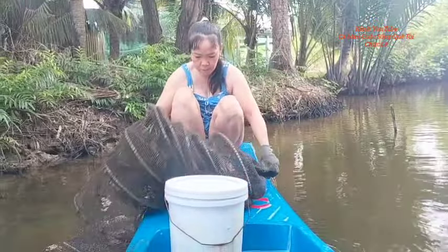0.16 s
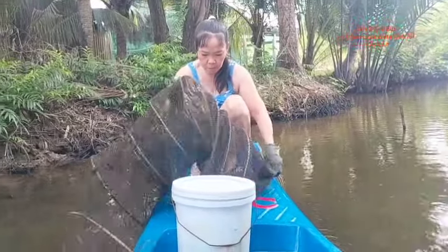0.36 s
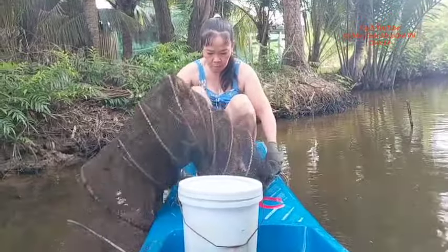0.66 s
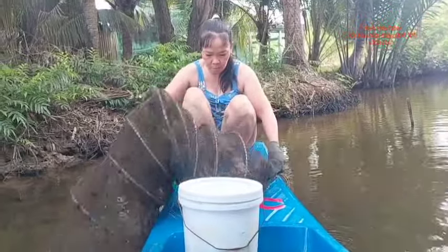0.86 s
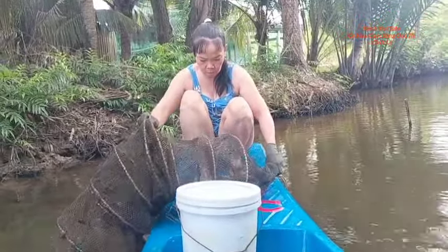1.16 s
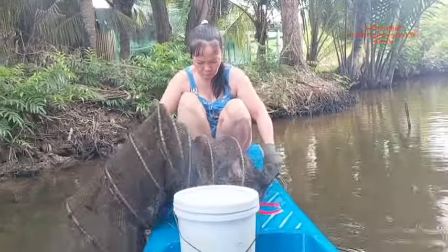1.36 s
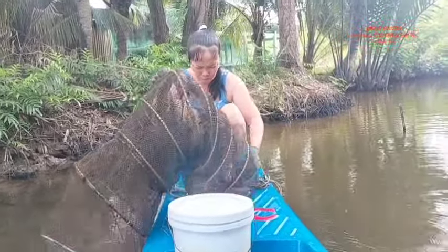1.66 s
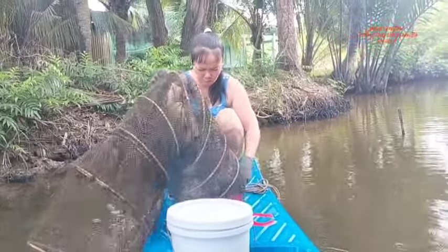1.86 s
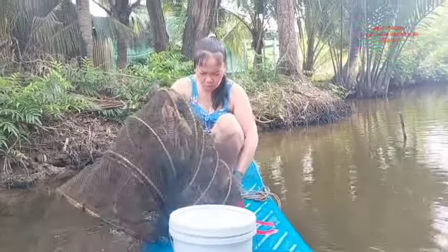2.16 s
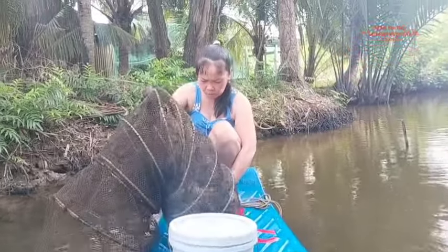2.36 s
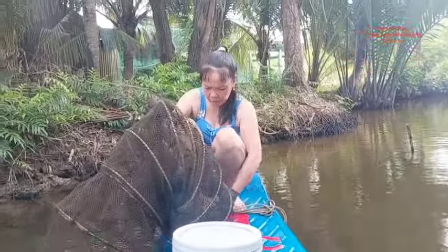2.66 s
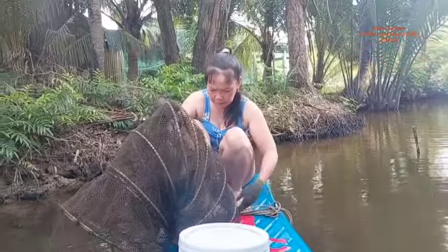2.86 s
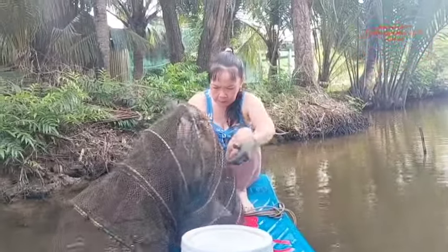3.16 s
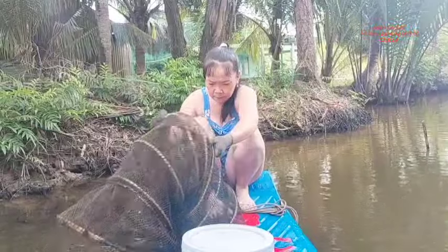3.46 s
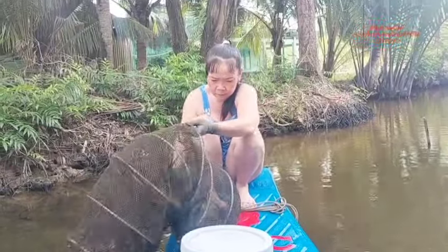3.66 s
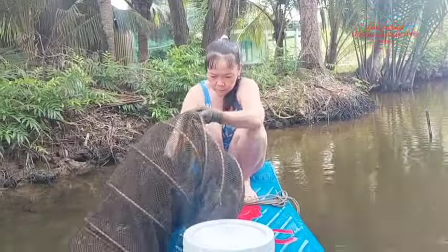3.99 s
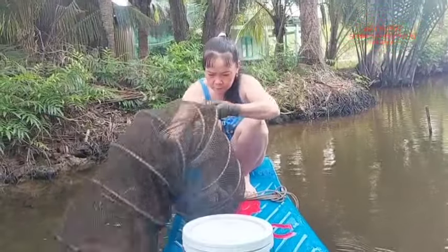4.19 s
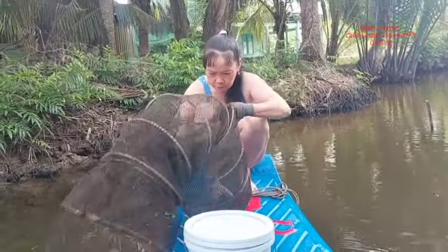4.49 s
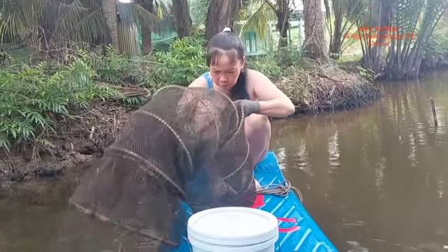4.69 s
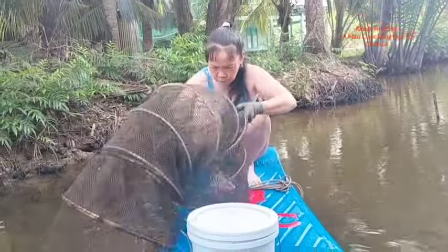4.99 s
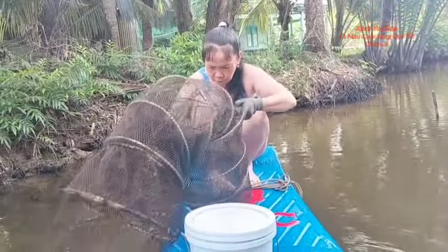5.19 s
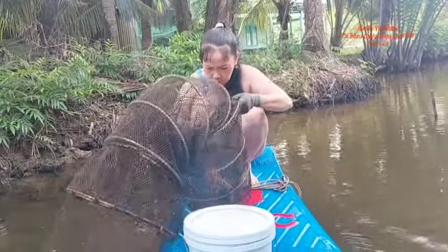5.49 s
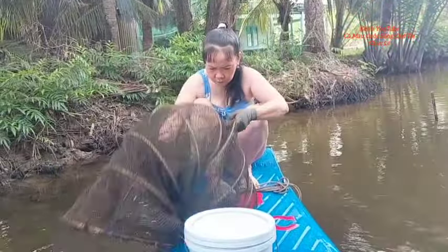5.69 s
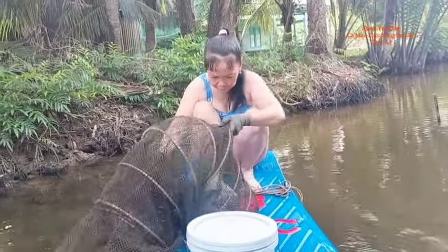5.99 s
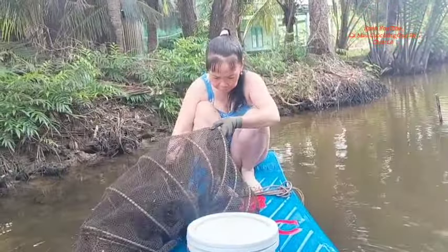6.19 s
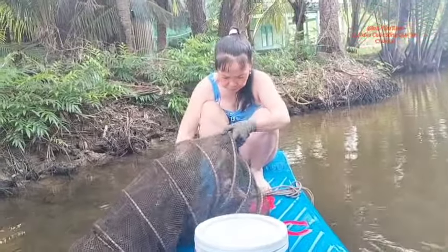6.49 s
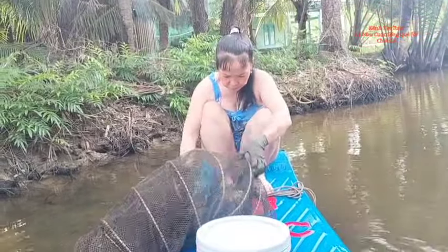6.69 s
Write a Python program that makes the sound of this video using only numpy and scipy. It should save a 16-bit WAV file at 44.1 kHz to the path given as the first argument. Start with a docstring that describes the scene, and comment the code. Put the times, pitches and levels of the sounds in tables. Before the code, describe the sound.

Close to a stereo microphone on a small boat, a wet net trap is dragged and shaken. Its hoops bump the hollow hull with dull booms and clatter, while live shrimp rattle in quick wet flurries and snap sharply against a plastic bucket. Water trickles and gurgles, leaves hiss faintly, and a distant falling whistle comes near the start and again late.

```python
"""Shaken shrimp trap on a small boat

On a quiet canal a net trap is gathered and shaken aboard a fibreglass boat, close to a camera's two microphones.
Live shrimp flick a plastic bucket: clumped noise grains in wet flurries, noise cracks for the sharp snaps.
Hoops and bucket bump the hollow hull (decaying modes), and the mesh drags over the deck (filtered grains).
Water gurgles and drips (rising sines), leaves hiss, and far off a wavering sine whistles among the palms."""
import sys
import numpy as np
from scipy import signal
from scipy.fft import rfft, irfft, next_fast_len
from scipy.io import wavfile
from scipy.ndimage import map_coordinates

SR = 44100
rng = np.random.default_rng(int(sys.argv[2]) if len(sys.argv) > 2 else 0)


def store_wav(level_fs):
    """Save 16-bit WAV to argv[1]."""
    pcm = np.round(np.clip(np.atleast_2d(level_fs), -1, 1) * 32767)
    wavfile.write(sys.argv[1], SR, pcm.T.astype(np.int16))


N = 301968

# Low rumble of hull and deck. Each row: frequency in Hz, relative level in dB per Hz.
RUMBLE_SPECTRUM = [(30, -14.5), (55, 3.5), (72, -3.5), (86, 6.5), (112, -2), (138, -2.5), (170, -4),
                   (208, -11), (260, -13.5), (420, -34.5), (1500, -120)]
# Threads and hard edges scuffing the deck. Each row: frequency in Hz, relative level in dB per Hz.
SCRAPE_SPECTRUM = [(180, -28), (300, -6.5), (500, 2), (800, -3.5), (1200, -12), (2200, -18), (4500, -28),
                   (16000, -43.5)]
# Patter of wet shells, also the body of the trickle. Each row: frequency in Hz, relative level in dB per Hz.
PATTER_SPECTRUM = [(300, -51.5), (700, 7), (1100, -1), (1700, 2), (2600, 2.5), (3600, -1.5), (5000, -14),
                   (12000, -37)]
# Bright spray of droplets and clicks. Each row: frequency in Hz, relative level in dB per Hz.
SPRAY_SPECTRUM = [(1200, -60), (2500, -20), (4200, 0), (6300, 0), (9500, -4), (12000, -3), (15500, -8),
                  (19000, -40)]
# Shakes of the net, each a flurry of wet shells and mesh.
# Each row: start in seconds, length in seconds, strength in dB (the layers it drives are set relative to it).
NET_SHAKES = [(0.547, 0.044, -55.5), (0.668, .025, -50.5), (0.769, 0.0033, -44), (0.804, 0.053, -46),
              (0.948, 0.056, -48), (1.172, 0.028, -46), (1.257, 0.051, -52.5), (1.348, 0.031, -49.5),
              (1.629, 0.051, -50), (1.712, 0.029, -53), (1.885, 0.0092, -52.5), (2.03, 0.15, -47),
              (2.497, 0.018, -44.5), (2.54, 0.014, -44), (2.648, 0.031, -51), (2.732, 0.035, -44),
              (2.855, 0.023, -44.5), (3.106, 0.063, -47), (3.631, 0.12, -52), (3.866, 0.0067, -48.5),
              (3.98, 0.046, -44), (4.178, 0.044, -48), (4.553, 0.029, -46.5), (4.749, 0.057, -46.5),
              (4.974, 0.014, -44), (5.08, 0.054, -53.5), (5.288, 0.0092, -49), (5.521, 0.063, -48),
              (5.757, .043, -41), (5.877, 0.034, -45), (6.082, .03, -43), (6.181, 0.017, -43),
              (6.25, 0.02, -45.5), (6.404, 0.046, -45.5), (6.558, 0.017, -56), (6.699, 0.054, -52)]


def amp(db):
    """Decibels to gain."""
    return 10 ** (np.asarray(db) / 20)


def unit(x):
    """Scale to rms 1."""
    return x / np.sqrt(np.mean(x ** 2) + 1e-20)


def along(points, hz):
    """Read (Hz, value) points on a log frequency axis."""
    f, v = np.transpose(points)
    return np.interp(np.log(hz + 1), np.log(f + 1), v)


def wobble(rate):
    """A smooth random curve with `rate` knots a second."""
    knots = rng.standard_normal(int(N * rate / SR) + 4)
    return map_coordinates(knots, [np.arange(N) * rate / SR])


def add(track, s, sound):
    """Mix a sound into a track at time s in seconds."""
    i = max(round(s * SR), 0)
    part = track[..., i:i + sound.shape[-1]]
    part += sound[..., :part.shape[-1]]


def colour(x, spectrum):
    """Causal (minimum-phase) filter that keeps the power of white noise."""
    m = 2 * next_fast_len(N // 2 + 8192)
    gain = unit(amp(along(spectrum, np.fft.rfftfreq(m, 1 / SR))))
    # folding the cepstrum onto positive time makes the filter causal
    cepstrum = irfft(np.log(gain + 1e-6), m)
    cepstrum[1:m // 2] *= 2
    cepstrum[m // 2 + 1:] = 0
    return irfft(rfft(x, m) * np.exp(rfft(cepstrum)), m)[..., :N]


def spread(pair):
    """Two unrelated signals become left and right, alike in the bass; the left microphone hears them first."""
    # Likeness of the two microphones. Each row: frequency in Hz, coherence from 0 to 1.
    likeness = [(25, 1), (70, 0.95), (200, 0.92), (500, 0.86), (1000, 0.4), (2500, 0.33), (4500, 0.23),
                (12000, 0.092)]
    lead_s = 0.00006
    hz = np.fft.rfftfreq(N, 1 / SR)
    turn = np.arccos(np.clip(along(likeness, hz), -1, 1)) / 2
    mid, side = rfft(pair) * [np.cos(turn), np.sin(turn)]
    right_delay = np.exp(-2j * np.pi * hz * lead_s)
    return irfft([mid + side, (mid - side) * right_delay], N)


def grains(rate, scatter_db):
    """Tiny contacts of uneven size, `rate` a second, rms 1; both microphones hear each, at unrelated strengths."""
    struck = rng.random(N) < rate / SR
    size = struck * amp(scatter_db * np.minimum(rng.exponential(size=N), 3))
    return unit(size * rng.standard_normal((2, N)))


def echo(x, decay):
    """A diffuse stereo tail of noise in which each frequency dies at its own speed."""
    hz, t, z = signal.stft(rng.standard_normal((2, SR // 2)), SR, nperseg=256)
    fade = amp(-60 * t / along(decay, hz)[:, None])
    tail = signal.istft(z * fade, SR, nperseg=256)[1]
    return signal.fftconvolve(np.atleast_2d(x), tail / np.linalg.norm(tail[0]), axes=1)[:, :N]


def ring(modes, rise, detune, scatter_db):
    """One blow on a set of modes, rms 1 over its first 30 ms; each blow lands on a new spot."""
    t = np.arange(SR // 2) / SR
    hz, db, t60 = np.transpose(modes)[:, :, None]
    shift, size, phase = rng.standard_normal((3, len(modes), 1))
    level = amp(db + scatter_db * size - 60 * t / t60)
    waves = level * np.sin(2 * np.pi * hz * (1 + detune * shift) * t + phase)
    sound = waves.sum(0) * (1 - np.exp(-t / rise))
    return sound / np.sqrt(np.mean(sound[:SR * 3 // 100] ** 2))


def canal():
    """Steady air over the water, a flickering hiss of palm leaves, and a light breeze on each microphone."""
    # Air over the water. Each row: frequency in Hz, relative level in dB per Hz.
    air_spectrum = [(20, 3.5), (45, 2.5), (80, 1), (200, -1.5), (320, -12.5), (800, -21.5), (1400, -27),
                    (2600, -30), (4000, -34), (6000, -42.5), (12000, -74)]
    # Hiss of the leaves. Each row: frequency in Hz, relative level in dB per Hz.
    leaf_spectrum = [(1500, -25), (3500, 3), (5200, 0), (8000, -2), (12000, -3), (15500, -7), (19000, -30)]
    # Breeze at the microphones. Each row: frequency in Hz, relative level in dB per Hz.
    breeze_spectrum = [(15, 8), (35, -10.5), (60, -6), (150, -10), (400, -120)]
    air = amp(-42.5) * colour(rng.standard_normal((2, N)), air_spectrum)
    leaves = amp(-63.5 + 0.5 * wobble(3)) * colour(rng.standard_normal((2, N)), leaf_spectrum)
    gusts = amp(-46 + 2.5 * np.array([wobble(4), wobble(4)]))
    gusts = gusts * amp([[-2], [2]])  # stronger on the right
    return spread(air + leaves) + gusts * colour(rng.standard_normal((2, N)), breeze_spectrum)


def whistle():
    """A far whistle: a wavering sine sinks in pitch, swells and ebbs, blurred by an echo from the trees."""
    # One table a call. Each row: time in seconds, mean pitch in Hz, relative level in dB.
    calls = [
        [(.39, 2790, -67), (.46, 2520, -52), (.51, 2235, -51), (.57, 2000, -60)],
        [(5.22, 2830, -59), (5.28, 2600, -52), (5.36, 2264, -59), (5.5, 1900, -61), (5.65, 1607, -58),
         (6.05, 1540, -61), (6.7, 1420, -66)],
    ]
    # Echo among the palms. Each row: frequency in Hz, decay by 60 dB in seconds.
    palm_decay = [(500, 1), (3000, 0.41), (10000, 0.059)]
    tone = np.zeros(N)
    for call in calls:
        s, hz, db = np.transpose(call)
        t = np.arange(s[0], s[-1], 1 / SR)
        pitch = np.interp(t, s, hz) * (1 + 0.016 * wobble(160)[:len(t)])
        level = amp(np.interp(t, s, db) + 3 * wobble(22)[:len(t)])
        add(tone, s[0], level * np.sin(2 * np.pi * np.cumsum(pitch) / SR))
    return amp(-10) * tone + amp(-3) * echo(tone, palm_decay)


def bubble(hz, t60):
    """A ringing air pocket whose pitch rises from hz as it nears the surface."""
    u = np.arange(int(t60 * SR)) / (t60 * SR)
    level = (1 - np.exp(-u / 0.03)) * amp(-60 * u)
    return level * np.sin(2 * np.pi * hz * t60 * (u + 0.163 * u ** 2))


def water(count=300):
    """The stirred hull murmurs, the wet net trickles in fine grains, and air pockets drip and gurgle."""
    # How hard the boat is stirred and the lifted net drains.
    # Each row: time in seconds, relative hull rumble in dB, relative trickle in dB.
    stirring = [(0.0, -31.5, -72), (0.78, -30.5, -65.5), (3.7, -43.5, -59), (6.85, -33.5, -64)]
    # Gurgles under the bow and drips off the net.
    # Each row: start in seconds, starting pitch in Hz, decay by 60 dB in seconds, relative level in dB.
    gurgles = [(1.83, 660, 0.052, -35.5), (1.959, 390, 0.17, -41.5), (2.324, 480, 0.09, -45.5),
               (2.585, 440, 0.21, -40), (3.948, 2370, 0.0055, -32.5), (4.086, 2160, 0.0066, -35),
               (4.37, 1070, 0.012, -33.5)]
    # Ring of drips among bucket and hull. Each row: frequency in Hz, decay by 60 dB in seconds.
    bucket_decay = [(200, 0.12), (1000, 0.1), (4000, 0.4), (12000, 0.61)]
    s, *columns = np.transpose(stirring)
    rumble_db, trickle_db = [np.interp(np.arange(N) / SR, s, c) for c in columns]
    murmur = colour(grains(rate=900, scatter_db=3.5), RUMBLE_SPECTRUM)
    rumble = amp(rumble_db - 4.5 + 4.9 * wobble(14.0)) * murmur
    runoff = amp(trickle_db + 1.2 * wobble(25)) * grains(rate=1800, scatter_db=2.5)
    trickle = amp(-0.5) * colour(runoff, PATTER_SPECTRUM) + amp(-3) * colour(runoff, SPRAY_SPECTRUM)
    drops = np.zeros((2, N))
    # most drips are tiny and sink into the trickle
    for when, pitch, size, side in rng.random((count, 4)):
        level = amp(trickle_db[int(when * N)] + 2 + 10 * size ** 3)
        drip = level * bubble(1100 * 3.5 ** pitch, t60=0.016)
        add(drops, when * N / SR, np.sqrt([[side], [1 - side]]) * drip)
    for s, hz, t60, db in gurgles:
        slosh = amp(4 * wobble(150)[:int(t60 * SR)])
        add(drops, s, amp(db + 5) * slosh * bubble(hz, t60))
    return spread(rumble + trickle) + drops + amp(1.5) * echo(drops, bucket_decay)


def slips():
    """Short strokes (s, length s, rumble dB, scrape dB): the mesh slips on a little after every shake."""
    extra_s, over_shake_db = 0.029, np.array((10.5, -1))  # rumble, scrape over the shake's strength
    return [(s, length + extra_s, *(db + over_shake_db)) for s, length, db in NET_SHAKES]


def net():
    """The mesh catches and slips on the deck: the hull rumbles and the threads scrape, both as filtered grains."""
    # Pulls of the net. Each row: start in seconds, length in seconds, relative rumble in dB, relative scrape in dB.
    pulls = [(0.077, 0.24, -52, -47.5), (0.262, 0.2, -22, -36), (0.518, 0.17, -30.5, -40.5),
             (0.805, 0.05, -22, -28.5), (1.128, 0.057, -28, -45), (1.242, 0.068, -32, -50),
             (1.53, 0.14, -24, -40), (2.053, 0.088, -20.5, -35.5), (2.482, 0.3, -34, -53),
             (2.86, 0.042, -39, -36), (4.22, 0.1, -32.5, -37.5), (6.08, 0.2, -40, -43.5)]
    rumble, scrape = np.zeros((2, N))
    for s, length, rumble_db, scrape_db in [*pulls, *slips()]:
        stroke = np.sin(np.linspace(0, np.pi, int(length * SR)))
        add(rumble, s, amp(rumble_db) * stroke)
        add(scrape, s, amp(scrape_db) * stroke)
    catch = amp(1.3 * wobble(60))
    threads = catch * scrape * grains(rate=2000, scatter_db=1)
    body = colour(catch * rumble * grains(rate=1400, scatter_db=5.5), RUMBLE_SPECTRUM)
    return spread(body + colour(threads, SCRAPE_SPECTRUM))


def bumps():
    """Rows (s, boom dB, panel dB, clatter dB): soft bumps boom, hard ones thud, light hard ones clatter most."""
    # Heavy bumps on the hull.
    # Each row: start in seconds, strength in dB, hardness from 0 (soft wet load) to 1 (bare hoop).
    knocks = [(0.612, -18, 0.48), (0.685, -21, 0), (0.812, -7.5, 0.05), (1.082, -27, 0), (1.176, -20, 0.24),
              (1.49, -17, 0.44), (1.827, -25, 0.26), (1.894, -34.5, .3), (2.036, -15.5, 0.62),
              (2.059, -20, 1), (2.141, -17.5, 0.14), (2.396, -25.5, 0), (2.55, -32, 0.95), (2.74, -23, 0),
              (2.824, -27.5, 0.08), (3.04, -19.5, 0.85), (3.06, -29.5, 0.93), (3.16, -27, 0.13),
              (3.256, -27, 0.27), (3.645, -33, 0.67), (4.022, -23, 0.56), (4.473, -26.5, 0.64),
              (4.498, -19.5, 0.22), (4.758, -20.5, 0.46), (4.952, -6, 0.59), (5.255, -19, .2),
              (5.53, -30, 1), (5.554, -22, 0), (5.712, -29.5, 0.99), (5.78, -15, 0.64),
              (5.906, -22.5, 0.48), (6.089, -26, 0.7), (6.418, -20.5, 0.34), (6.545, -23, 0.12),
              (6.695, -20, 0.23), (6.809, -18, 0.48)]
    # boom, panel, clatter over the strength of a soft and of a hard bump
    soft_db, hard_db = (0.5, -14.5, -22.5), (-6.5, 1.5, -10)
    # the hull gives under the load: clatter dB lost per dB of strength over a typical bump
    typical_db, give = -23, 0.47
    s, db, hardness = np.transpose(knocks)
    boom, panel, clatter = [db + soft + hardness * (hard - soft) for soft, hard in zip(soft_db, hard_db)]
    return np.transpose([s, boom, panel, clatter - give * (db - typical_db)])


def jolts():
    """Light bumps, rows like those of bumps(): just after every shake the load lands on the hull."""
    delay_s, over_shake_db = 0.00823, np.array((9.5, 10.5, -1.5))  # boom, panel, clatter over the shake
    return [(s + delay_s, *(db + over_shake_db)) for s, length, db in NET_SHAKES]


def hull():
    """Each bump rings hull modes: a short boom, a panel thud, a scuffing clatter; the hollow rings on."""
    # Deep boom. Each row: mean frequency in Hz, relative level in dB, decay by 60 dB in seconds.
    boom_modes = [(69.3, -19.5, 0.11), (90, -5.5, 0.08), (108.4, -1.5, 0.049)]
    # Air in the hull. Each row: mean frequency in Hz, relative level in dB, decay by 60 dB in seconds.
    hollow_modes = [(84.9, -2, 0.25), (120.5, -8, 0.56), (210, -13, 0.31)]
    # Panel thud. Each row: mean frequency in Hz, relative level in dB, decay by 60 dB in seconds.
    panel_modes = [(154.4, -3.5, 0.075), (183.6, -4.5, 0.12), (208, -4, 0.067), (256.3, -6, 0.055)]
    # Clatter. Each row: mean frequency in Hz, relative level in dB, decay by 60 dB in seconds.
    clatter_modes = [(313, 9, 0.17), (351, 7, 0.12), (413, 8, 0.11), (498.8, 2, 0.22), (572, 12, 0.057),
                     (636, 11, 0.056), (805, 7.5, 0.07), (826.4, -1, 0.13), (970, 4, 0.077),
                     (1120, 0, 0.078)]
    low, clatter, scuff = np.zeros(N), np.zeros((2, N)), np.zeros((2, N))
    t = np.arange(SR // 4) / SR
    for s, boom_db, panel_db, clatter_db in [*bumps(), *jolts()]:
        add(low, s, amp(boom_db) * ring(boom_modes, rise=0.04, detune=0.031, scatter_db=-3.5))
        add(low, s, amp(boom_db - 19) * ring(hollow_modes, rise=0.03, detune=0.01, scatter_db=2))
        add(low, s, amp(panel_db) * ring(panel_modes, rise=0.012, detune=0.021, scatter_db=1.5))
        # each microphone gets its own clatter
        both = [ring(clatter_modes, rise=0.002, detune=0.025, scatter_db=3) for side in range(2)]
        add(clatter, s, amp(clatter_db + 0.5) * np.array(both))
        add(scuff, s, amp(clatter_db - 4 - 60 * t / 0.11) * (1 - np.exp(-t / 0.001)))
    scuffing = colour(scuff * grains(rate=2600, scatter_db=-15.5), SCRAPE_SPECTRUM)
    return low + spread(clatter + scuffing)


def wall(x, low_hz=650, high_hz=3800, sharpness=7, gain=1.0, count=4):
    """Each spot of the bucket wall favours a few resonances of its own."""
    spots = np.exp(rng.uniform(np.log(low_hz), np.log(high_hz), count))
    return x + gain * sum(signal.lfilter(*signal.iirpeak(hz, sharpness, fs=SR), x) for hz in spots)


def twitches(count=40, tap_db=-60, click_db=-59):
    """Faint stray flicks (s, tap dB, click dB): a shaken shrimp goes on twitching for a moment."""
    which, delay, tap, click = rng.random((count, 4)).T
    shaken = np.array(NET_SHAKES)[(which * len(NET_SHAKES)).astype(int), 0]
    return np.transpose([shaken + 0.37 * delay, tap_db + 8 * tap, click_db + 8 * click])


def flurries():
    """Rows (s, length s, patter dB, spray dB): a shake throws the catch about, a bump only rattles it."""
    thrown = [(s, length, db - 0.15, db - 1.1) for s, length, db in NET_SHAKES]
    rattle_s, over_clatter_db = 0.011, np.array((-13, -24.5))  # patter, spray over the bump's clatter
    rattled = [(s, rattle_s, *(clatter_db + over_clatter_db)) for s, _, _, clatter_db in bumps()]
    return thrown + rattled


def shrimp():
    """Flurries of tiny shell contacts, each with a brief wash in the bucket, and single hard noise cracks."""
    # The hardest tail flicks on the plastic. Each row: strike in seconds, relative tap in dB, relative click in dB.
    snaps = [(0.9751, -37, -41), (0.8329, -36, -62), (1.1952, -37.5, -43), (1.3519, -33, -35.5),
             (1.6427, -43, -42.5), (1.6654, -39, -43), (2.0782, -41, -36), (2.1415, -37, -45),
             (2.6716, -38.5, -59), (2.7524, -30, -35), (3.6673, -44, -37.5), (4.2476, -39.5, -48),
             (5.5379, -40, -41), (5.7774, -38, -52), (5.8421, -43, -46), (5.9021, -35.5, -51),
             (6.1458, -38, -40.5), (6.4322, -43, -39.5), (6.7184, -38.5, -44.5), (6.8383, -38, -38)]
    taps, clicks = np.zeros((2, 2, N))
    t = np.arange(SR // 3) / SR
    # contacts come in clumps a few milliseconds long
    clumps = unit(amp(3.2 * wobble(130)))
    shells = clumps * grains(rate=1300, scatter_db=2.5)
    droplets = clumps * grains(rate=2600, scatter_db=2.5)
    for s, length, patter_db, spray_db in flurries():
        rise, after = np.minimum(t / 0.012, 1), np.maximum(t - length, 0)
        swell = rise * amp(-60 * after / 0.086)
        wash = rise * amp(-9 - 60 * after / 0.48) * rng.standard_normal((2, len(t)))
        # every flurry takes a random stretch of the contacts
        stretch = rng.integers(N - len(t)) + np.arange(len(t))
        patter = swell * shells[:, stretch] + amp(-6.5) * wash
        add(taps, s, wall(amp(patter_db - 1.5) * patter))
        add(clicks, s, amp(spray_db) * (swell * droplets[:, stretch] + wash))
    # the tail brushes the wall just before it strikes
    brush_s = 0.012
    since = t - brush_s
    brush = amp(-12 - 60 * np.abs(since) / 0.035)
    strike = amp(-60 * np.abs(since) / 0.02)
    shape = np.where(since < -0.001, brush, strike)
    for s, tap_db, click_db in [*snaps, *twitches()]:
        crack = rng.standard_normal((2, len(t))) * shape
        add(taps, s - brush_s, wall(amp(tap_db + 1) * crack))
        add(clicks, s - brush_s, amp(click_db + 3) * crack)
    # taps lean to the right, clicks slightly to the left
    tapping = spread(colour(taps, PATTER_SPECTRUM)) * amp([[-1.3], [1.3]])
    clicking = spread(colour(clicks, SPRAY_SPECTRUM)) * amp([[0.5], [-0.5]])
    return tapping + clicking


def scene():
    """Surroundings, boat and catch."""
    return canal() + whistle() + water() + net() + hull() + shrimp()


def record(dry):
    """The camera clips at full scale and keeps nothing above its band limit."""
    top_hz = 15950
    m = next_fast_len(N + SR // 4)
    kept = np.fft.rfftfreq(m, 1 / SR) < top_hz
    return irfft(rfft(np.clip(dry, -1, 1), m) * kept, m)[:, :N]


dry = scene()
out = record(dry)
store_wav(out)
```